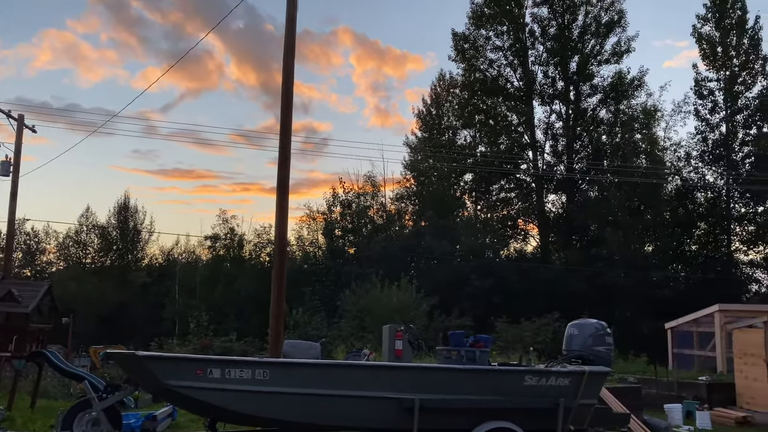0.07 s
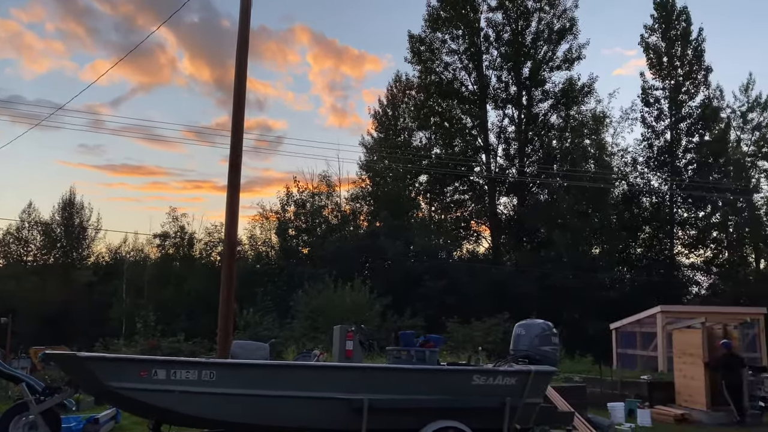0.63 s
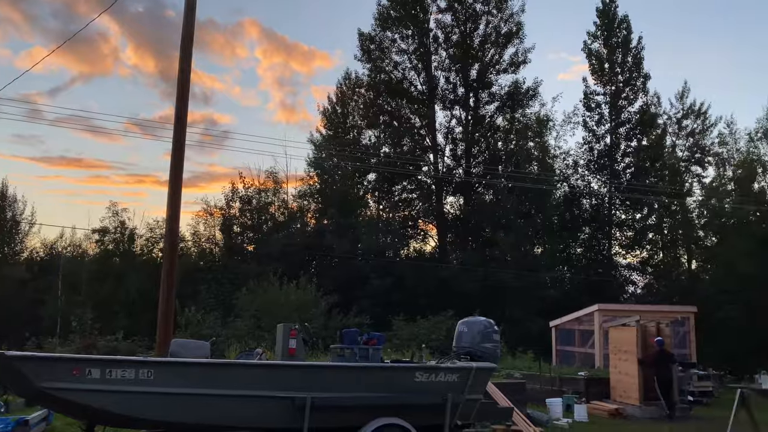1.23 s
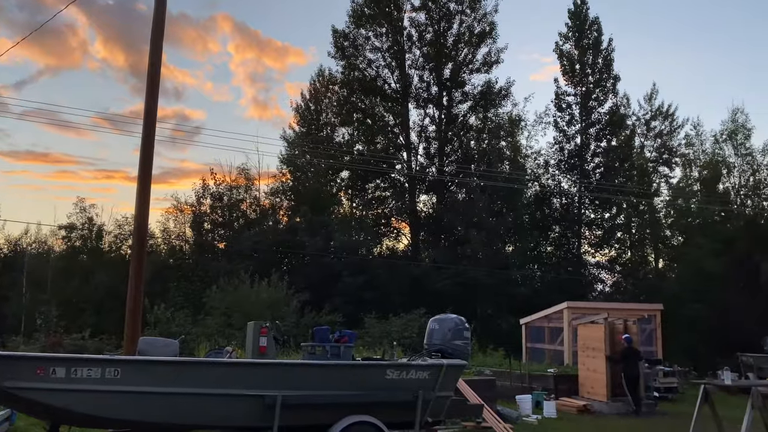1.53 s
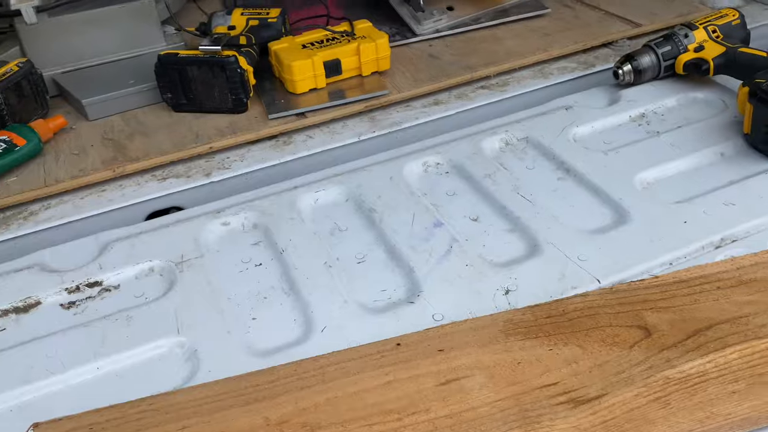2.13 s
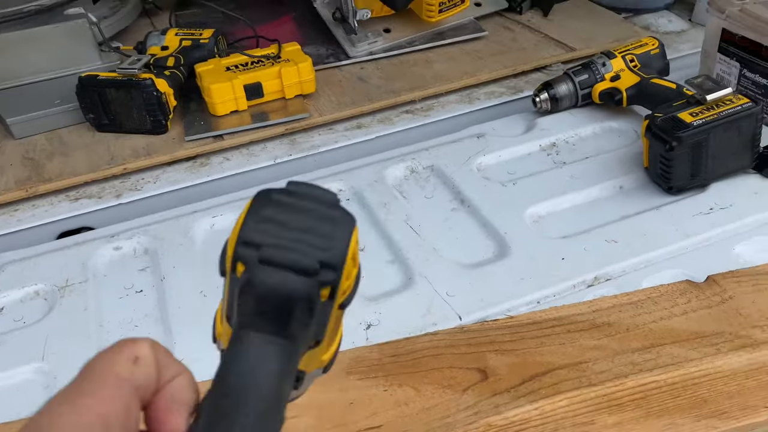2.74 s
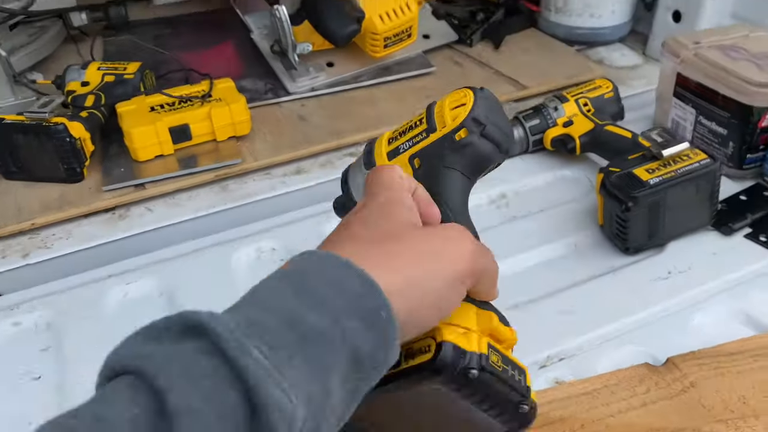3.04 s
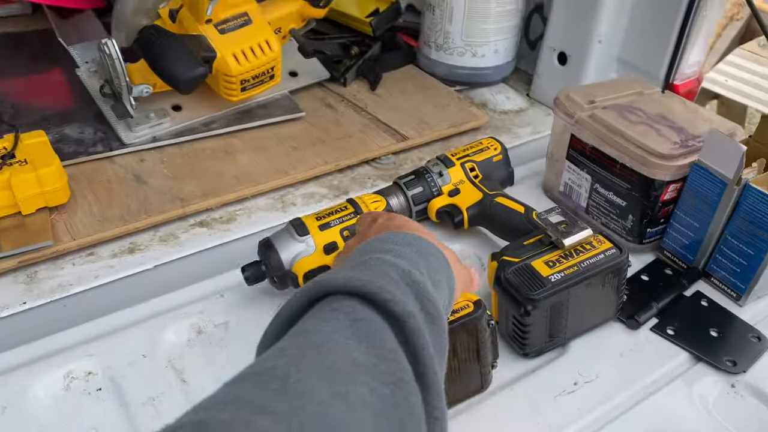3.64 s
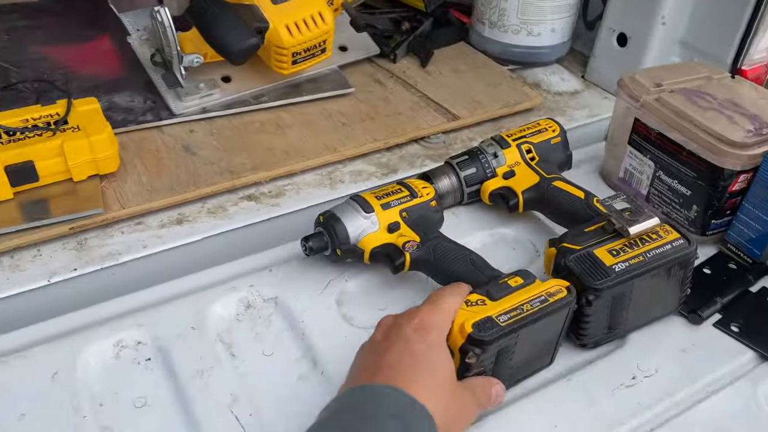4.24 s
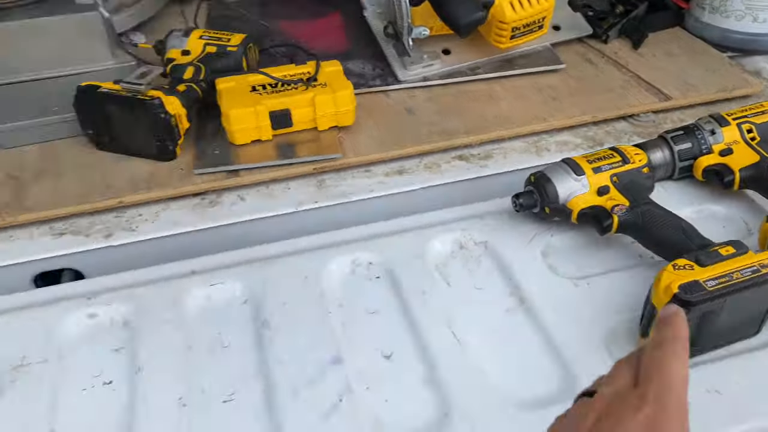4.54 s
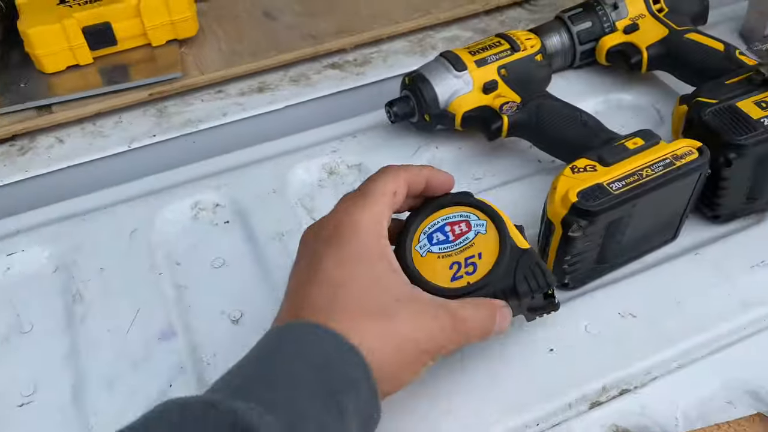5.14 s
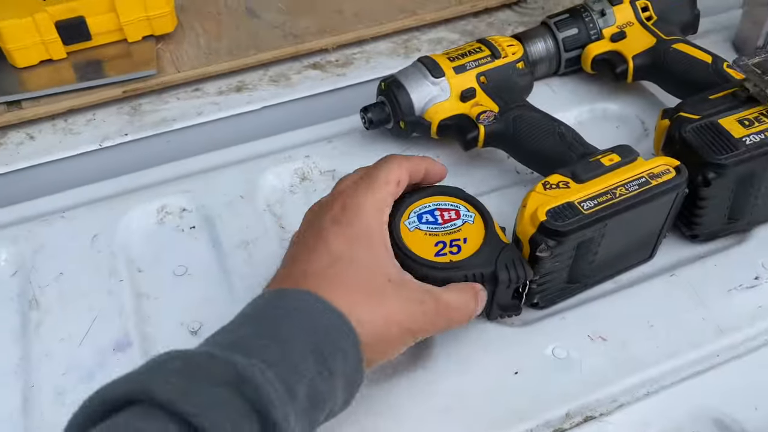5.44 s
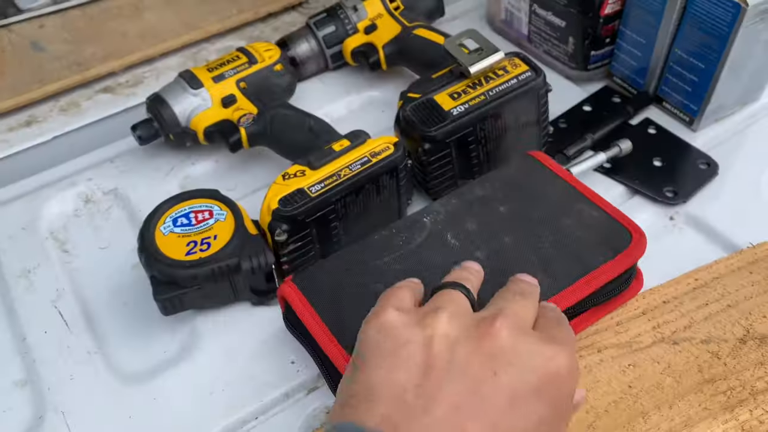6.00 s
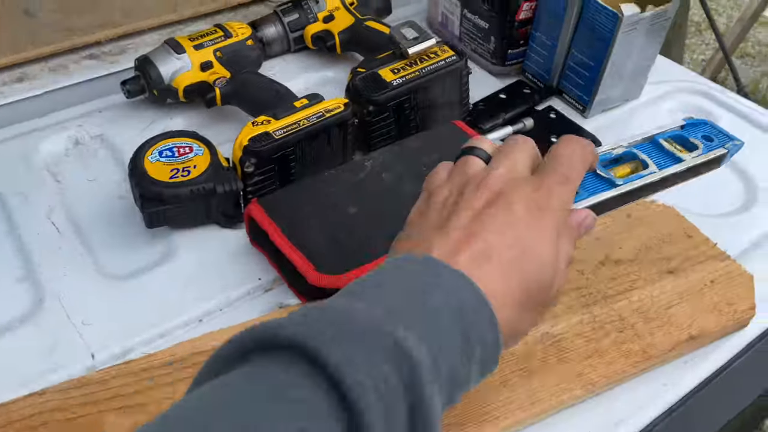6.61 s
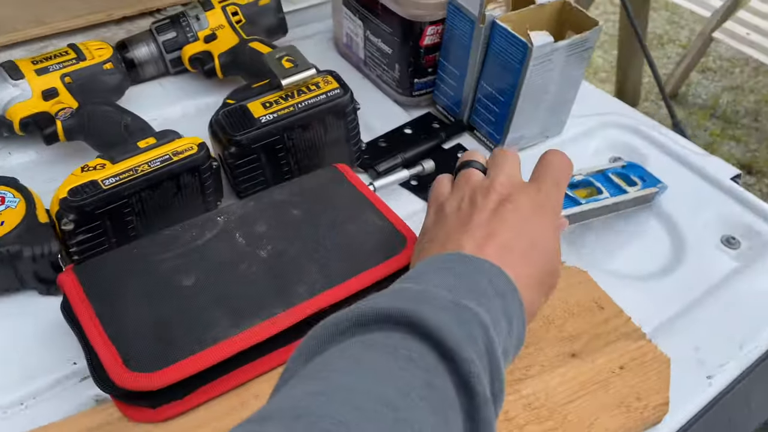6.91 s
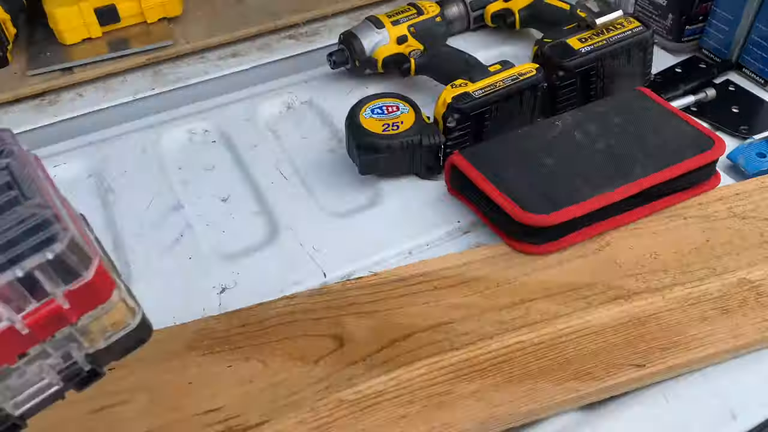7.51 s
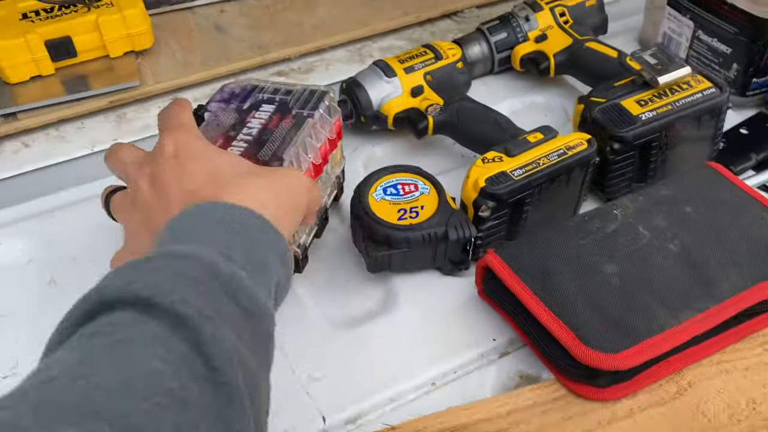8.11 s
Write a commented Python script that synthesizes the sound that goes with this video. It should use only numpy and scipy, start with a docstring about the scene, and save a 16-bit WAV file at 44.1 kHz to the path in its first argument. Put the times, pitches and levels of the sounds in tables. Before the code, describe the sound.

Tools knock and rattle one after another onto a steel truck tailgate, with soft sleeve rustle and a distant road.

```python
"""Tools on a steel tailgate

Outdoors, over the hum of a far road, a driver (landing first on its battery, then tipping onto its nose), a
tape measure, a pouch of bits, a spirit level and a plastic case are laid on a truck's tailgate. Each impact
gives a contact click, a hollow knock of the tool and a boom from the panel's bending modes; some set the tool
chattering and ringing. Between impacts a sleeve rustles by friction and plastic taps lightly in the hand."""
import sys
import numpy as np
from scipy import signal
from scipy.fft import rfft, irfft
from scipy.io import wavfile
from scipy.ndimage import uniform_filter1d

SR = 44100
rng = np.random.default_rng(int(sys.argv[2]) if len(sys.argv) > 2 else 0)


def digitize_waveform(pressure):
    """Quantize a signal to 16-bit integers and store it at the path in sys.argv[1].

    Rows of a 2-D input are taken as channels; values are limited to [-1, 1].
    """
    field = np.atleast_2d(pressure).T
    bounded = np.clip(field, -1, 1)
    quanta = np.round(bounded * 32767).astype(np.int16)
    wavfile.write(sys.argv[1], SR, quanta)


N = 368676
SIZE = 32768  # samples in one impact
T, HZ = np.arange(SIZE) / SR, np.fft.rfftfreq(SIZE, 1 / SR)
# spectral density of a contact click: f/Hz, level/dB
CLICK_SPECTRUM = [(100, -13.5), (500, 6.5), (1200, 2.5), (3000, -2), (4000, -4.5), (5000, -11), (6600, -6),
                  (8500, -19.5), (11000, -14), (13000, -30.5), (16000, -24)]


def amp(db):
    """Amplitude ratio of a level in decibels."""
    return 10 ** (np.asarray(db) / 20)


def read(points, hz):
    """Interpolation of a spectrum on a log-frequency axis."""
    f, value = np.transpose(points)
    return np.interp(np.log(hz + 1e-9), np.log(f), value)


def curve(points, t):
    """Linear interpolation of a control at times t."""
    return np.interp(t, *np.transpose(points))


def unit(x):
    """Normalisation to unit energy."""
    return x / np.sqrt(np.mean(np.sum(x ** 2, -1)) / SR + 1e-20)


def add(mix, s, sound):
    """Superposition of a sound on the mix at time s."""
    part = mix[:, round(s * SR):][:, :SIZE]
    part += sound[..., :part.shape[1]]


def colour(x, db):
    """Minimum-phase filtering: the response is causal, so attacks stay sharp."""
    log_gain = np.log(amp(np.maximum(db, db.max() - 90)))
    mirrored = np.concatenate([log_gain, log_gain[-2:0:-1]])
    return irfft(rfft(x) * np.exp(np.conj(signal.hilbert(mirrored)))[:len(HZ)])


def hump(centre_hz, octaves, slope_db, hz=HZ):
    """Band-pass response in dB: a rounded peak whose skirts fall by slope_db an octave."""
    return -slope_db * (np.hypot(np.log2((hz + 1) / centre_hz), octaves) - octaves)


def pair(z, coherence):
    """Partial coherence: two independent spectra are mixed into left and right."""
    c = np.clip(coherence, -1, 1)
    return np.array([z[0], c * z[0] + np.sqrt(1 - c ** 2) * z[1]])


def wash(shape_db, patchy_db):
    """A diffuse field: noise of unit level with the spectrum shape_db(hz, s), in drifting patches."""
    # likeness of the field at the two ears: f/Hz, coherence
    coherence = [(60, 0.99), (130, .85), (290, 0.68), (640, -0.22), (2500, -0.017), (15000, 0.22)]
    hz, t = np.fft.rfftfreq(2048, 1 / SR), np.arange(N // 512 + 5) * 512 / SR
    real, imag = rng.standard_normal((2, 2, len(t), len(hz)))
    patches = uniform_filter1d(rng.standard_normal(real[0].shape), size=8, axis=0)
    patches = uniform_filter1d(patches, size=12, axis=1)
    gain = amp(shape_db(hz, t[:, None]) + patchy_db * patches / patches.std())
    spectra = pair(real + 1j * imag, read(coherence, hz)) * gain
    x = signal.istft(spectra.transpose(0, 2, 1), nperseg=2048, noverlap=1536)[1][:, :N]
    return x / x.std()


def far_road(t):
    """Rolling noise: distant tyres radiate a broad band that drifts in pitch and level."""
    # strength of the hum: t/s, level/dB
    loudness = [(0, -52.5), (1.5, -51.5), (2.3, -54), (3.5, -57.5), (4.9, -49.5), (6.3, -47.5),
                (6.8, -54.5), (8.3, -51)]
    # centre of the band: t/s, f/Hz
    centre = [(.7, 682.5), (2, 713), (2.3, 1011), (5.5, 990), (6.3, 1085), (8, 920)]
    # shape of the band: multiple of the centre, level/dB
    band = [(.2, -11), (.5, -10), (.75, -3), (1, 0.5), (1.3, -6.5), (1.8, -14.5), (2.6, -28.5),
            (4.4, -63.5)]
    return wash(lambda hz, s: read(band, hz / curve(centre, s)), 1) * amp(curve(loudness, t))


def outdoor_air(t, cut_s=2.02, fade_s=0.015):
    """Ambient noise: the background cuts abruptly to a deeper rumble and a different hiss."""
    # spectral density before the cut: f/Hz, level/dB
    early_spectrum = [(20, -38), (45, -25), (70, 6), (190, 2.5), (350, -5), (700, -36), (1700, -36.5),
                      (15000, -47)]
    # spectral density after the cut: f/Hz, level/dB
    late_spectrum = [(15, -25), (35, -19), (62, 5), (90, -10.5), (150, -15), (300, -21), (700, -19.5),
                     (2000, -28.5), (6000, -60), (15000, -73.5)]
    early = wash(lambda hz, s: read(early_spectrum, hz), 0.51) * amp(-57.5)
    late = wash(lambda hz, s: read(late_spectrum, hz), 1.7) * amp(-48)
    after_cut = np.clip((t - cut_s) / fade_s + .5, 0, 1)
    return (1 - after_cut) * early + after_cut * late


def effort(t, roundness=0.7):
    """Envelope of the sleeve's rubbing: incoherent swells, one an arm movement, add in power."""
    # arm movements: peak t/s, level/dB, rise/s, fall/s
    strokes = [(0.07, -74, 0.036, 0.045), (1.487, -71, .008, .025), (1.91, -68, .008, .012),
               (2.04, -65, 0.0083, 0.023), (2.149, -49, 0.013, 0.041), (2.435, -49, 0.043, 0.053),
               (2.785, -53.5, 0.13, 0.082), (3.157, -60, 0.032, 0.041), (3.602, -73, 0.068, 0.3),
               (4.661, -59, 0.33, 0.19), (5.85, -44.5, 0.022, 0.072), (6.585, -53, 0.044, 0.066),
               (6.83, -55.5, 0.054, 0.36), (7.095, -47.5, 0.046, 0.065), (7.533, -46, 0.0065, 0.024),
               (7.615, -44, 0.027, 0.036), (8.301, -43.5, 0.11, 0.44)]
    power = 1e-12
    for s, db, rise_s, fall_s in strokes:
        away = np.maximum((s - t) / rise_s, (t - s) / fall_s)
        power = power + (amp(db) * np.exp(-away ** roundness)) ** 2
    return np.sqrt(power)


def sleeve(t, grain_db=3):
    """Friction noise: cloth rustles in uneven grains as its threads and folds rub."""
    # spectral density of the rustle: f/Hz, level/dB
    spectrum = [(300, -29), (1200, 1), (2800, -7.5), (7000, -10), (9000, -11), (12000, -11), (15000, -28.5)]
    # brightness, greatest while the arm reaches far: t/s, tilt/(dB/octave)
    tilt = [(2.2, -10.5), (3.4, 4), (4.8, -5), (6.1, -4), (7.6, -6.5)]
    cloth = wash(lambda hz, s: read(spectrum, hz) + curve(tilt, s) * np.log2((hz + 500) / 3000), 2)
    threads = uniform_filter1d(rng.standard_normal(N), size=180)
    folds = uniform_filter1d(rng.standard_normal(N), size=1100)
    grains = threads + 2 * folds
    return cloth * effort(t) * amp(grain_db * grains / grains.std())


def ears(delay_s=6e-5):
    """Interaural delay: partly coherent white noise reaches the nearer, left ear first."""
    # likeness of an impact at the two ears: f/Hz, coherence
    coherence = [(170, 0.5), (400, 1.08), (900, 0.7), (2500, 0.38), (8000, -0.1)]
    lag = np.exp(-2j * np.pi * HZ * delay_s * np.array([[0], [1]]))
    return irfft(pair(rfft(rng.standard_normal((2, SIZE))), read(coherence, HZ)) * lag)


def burst(db, t60, tail_db, tail_t60, spike=0):
    """Overlapping modes decay like noise: an optional bright spike, a quick snap, a duller tail."""
    noise = ears()
    treble = HZ ** 2 / (HZ ** 2 + 7500 ** 2)
    crack = colour(noise * spike * np.exp(-T / .0028), db)
    snap = colour(noise * amp(-60 * T / t60), db - 12 * treble)
    tail = colour(noise * amp(tail_db - 60 * T / tail_t60), db - 27 * treble)
    return unit(crack + snap + tail)


def tap(knock_hz):
    """A light, well-damped impact: a short knock and a click."""
    knock = burst(hump(knock_hz, 0.13, 23), t60=0.038, tail_db=-23.5, tail_t60=0.33)
    click = burst(read(CLICK_SPECTRUM, HZ), t60=0.012, tail_db=-2, tail_t60=0.4, spike=2.5)
    return knock + amp(-15.5) * click


def handling(t, ticks_per_s=8):
    """Light taps, plastic in the hand and a few small rattles of the bits in their pouch, and a Poisson process
    of faint ticks scaled by the arm's movement."""
    # light taps (those at 5.909 and 5.997 s are small rattles of the bits in the pouch): t/s, energy level/dB,
    # knock f/Hz
    taps = [(0.46, -87, 1590), (2.244, -50.5, 780), (2.286, -61, 1100), (2.428, -51, 1014),
            (2.581, -76, 2770), (2.704, -71.5, 2570), (2.837, -85, 4400), (3.153, -71.5, 1530),
            (4.509, -66.5, 1180), (5.072, -69.5, 1900), (5.909, -62.5, 3180), (5.997, -71, 3470),
            (6.5633, -61.5, 2120), (6.584, -65.5, 2390), (6.843, -62.5, 1430), (6.983, -67, 1500),
            (7.238, -66, 2510), (7.548, -74, 2830), (7.611, -70, 1850), (7.914, -64.5, 1220)]
    out = np.zeros((2, N))
    for s, db, knock_hz in taps:
        add(out, s, amp(db) * tap(knock_hz))
    contacts = rng.random(N) < ticks_per_s / SR
    ticks = contacts * amp(-19.5 + 6 * rng.uniform(-0.56, 1, N)) * effort(t)
    return out + signal.oaconvolve(ticks[None], tap(knock_hz=2360), axes=1)[:, :N]


def partials(modes, detune, phase):
    """Free vibration: one damped sine a mode, detuned slightly by the load on the metal."""
    hz, db, t60 = np.transpose(modes)[:, :, None]
    hz = hz * (1 + detune * rng.standard_normal(hz.shape))
    return amp(db - 60 * T / t60) * np.sin(2 * np.pi * (hz * T + phase))


def panel(centre_hz, damping_db_per_s, rise_cycles=1.2):
    """Plate bending modes: those near the boom's centre are driven hardest; lower ones build slower."""
    # low modes of the tailgate: f/Hz, level/dB, t60/s
    modes = [(102, -3, 0.82), (118.7, 5.5, 0.52), (144.4, -4, 0.4), (175.5, -6, 0.45), (191.7, -3, 0.4),
             (236.9, 3.5, 0.27), (266.5, -0.5, 0.33), (307, -4, 0.17), (370.7, -9, .33)]
    hz = np.transpose(modes)[0][:, None]
    build = 1 - np.exp(-(T * hz / rise_cycles) ** 2)
    swing = 1 + 0.53 * np.exp(-(T / 0.03) ** 2)  # largest at first, then the tool's weight damps it
    excitation = amp(hump(centre_hz, 0.1, 7.8, hz))
    tones = (excitation * build * swing * partials(modes, 0.015, rng.random(hz.shape))).sum(0)
    flex = burst(hump(centre_hz, 0.079, 24), t60=0.19, tail_db=-8, tail_t60=0.34)
    return unit((unit(tones) + amp(-1) * flex) * amp(-abs(damping_db_per_s) * T))


def skin(knock_hz, t60=.21):
    """Resonance: the steel's modes nearest the knock ring, a little out of phase at the two ears."""
    # upper modes of the tailgate's skin: f/Hz, level/dB
    upper_modes = [(463, 8), (592, -8), (630, 0.5), (815, 2), (856, -6.5), (904, -4), (996, -3.5),
                   (1061, -1.5), (1170, -4), (1389, -3.5)]
    modes = [(hz, db + hump(knock_hz, 0.36, 36, hz), t60) for hz, db in upper_modes]
    phase = rng.random((len(modes), 1)) + 0.17 * rng.standard_normal((2, len(modes), 1))
    return unit(partials(modes, 0.008, phase).sum(1))


def between(soft, hard, hardness):
    """Linear interpolation from a soft contact to a hard one."""
    return soft + (hard - soft) * hardness


def tailgate(settle_db_per_s=36):
    """Impact excitation: the panel booms, the suspension thumps, the tool knocks, the contact clicks."""
    # impacts: t/s, tool, boom level/dB, boom centre f/Hz, contact hardness (0-1)
    blows = [(3.734, "battery", -49.5, 238, 0.67), (3.742, "battery", -39, 135, 0.38),
             (3.782, "battery", -46.5, 195, 0.49), (3.856, "battery", -31, 215, 0.84),
             (3.858, "battery", -34, 330, 0), (3.882, "driver", -44, 340, 0.72),
             (3.951, "battery", -34.5, 285, 0.67), (4.157, "battery", -51, 240, 0.67),
             (4.167, "battery", -46, 113.6, 0.39), (4.205, "battery", -47, 209, 0.57),
             (4.3109, "driver", -38.5, 238, 0.7), (4.319, "driver", -33.5, 244, 0.4),
             (5.284, "tape", -45.5, 205.4, 0.47), (5.3503, "tape", -50.5, 205, 0.51),
             (5.353, "tape", -51.5, 232, 0.34), (5.389, "tape", -53, 162.7, 0.46),
             (5.8601, "pouch", -41.5, 211, 0.69), (5.902, "pouch", -46, 274, 1),
             (5.935, "pouch", -42, 195, 0.44), (6.01, "pouch", -43, 139, 0.33),
             (6.911, "level", -41.5, 247, 0.83), (6.933, "level", -41, 246, 0.55),
             (7.085, "level", -52.5, 275, 0.62), (7.174, "level", -42.5, 195, 0.69),
             (7.180, "level", -37.5, 295, 0.78), (8.1016, "case", -36, 183, 0.33),
             (8.229, "case", -51.5, 182, 0.35), (8.268, "case", -31.5, 227, 0.52),
             (8.300, "case", -40, 193, 0), (8.3059, "case", -48.5, 227, 0.67), (8.335, "case", -50, 170, 0)]
    # by tool, before hardness and settling act: thump level/dB, knock f/Hz, click level/dB,
    # click tilt/(dB/octave), ring length factor, panel damping/(dB/s) (sign ignored)
    tools = {"battery": (-5, 524, -0.5, -3, 3, -9), "driver": (-24.5, 790.5, -3, -2.5, 2, 9),
             "tape": (-5, 680, 7.5, 8, 3.5, 25.5), "pouch": (-12, 759.5, -11, -8, 3.5, 4.5),
             "level": (-18, 866.5, 2, 0, 1.9, 55.5), "case": (-14, 702, 10.5, -1, 2.5, 28.5)}
    out, first_touch = np.zeros((2, N)), {}
    thump = unit(T * np.exp(-(T / 0.026) ** 2) * np.sin(2 * np.pi * 72 * T))
    for s, tool, boom_db, boom_hz, hardness in blows:
        weight_db, shell_hz, edge_db, edge_tilt_db, ring, damping_db_per_s = tools[tool]
        # the thump fades once the tool's weight rests on the steel
        thump_db = weight_db - settle_db_per_s * (s - first_touch.setdefault(tool, s))
        # a harder contact gives more knock, a louder, brighter click and a shorter ring
        knock_db = between(-26, 5.5, hardness)
        click_db = edge_db + between(-35, 1.5, hardness)
        tilt_db = edge_tilt_db + between(-13.5, 9.5, hardness)
        length = ring * between(0.84, 0.75, hardness)
        knock_hz = shell_hz * (boom_hz / 235) ** 0.21  # rises gently with the boom's centre
        shell = burst(hump(knock_hz, 0.84, 31), t60=0.044 * length, tail_db=-18.5, tail_t60=0.092)
        knock = unit(shell + amp(-3.5) * skin(knock_hz))
        click_shape = read(CLICK_SPECTRUM, HZ) + tilt_db * np.log2((HZ + 500) / 3000)
        click = burst(click_shape, t60=0.048 * length, tail_db=-9, tail_t60=0.18, spike=0.81)
        boom = panel(boom_hz, damping_db_per_s)
        blow = boom + amp(thump_db) * thump + amp(knock_db) * knock + amp(click_db) * click
        add(out, s, amp(boom_db) * blow)
    return out


def ringing_tools(bounce_gap_s=.007, bounce_s=.0016, slide_db=-8, strike_db=-10):
    """Forced vibration: a strike, brief chatter and dying bounces drive a tool's resonances."""
    # resonances of the driver's steel nose, the tape measure, the steel bits, the aluminium level
    # and the plastic case: f/Hz, width/Hz, level/dB
    driver = [(858, 47, 25), (1027, 50, 24), (2007, 110, 13.5), (2770, 170, 5.5), (4700, 430, -0.5),
              (6760, 670, -37.5)]
    tape = [(657, 65, 9), (943, 20, 5.5), (2450, 46, -7), (2940, 340, -15), (3830, 170, -20),
            (7120, 420, -16.5)]
    bits = [(1330, 100, 10.5), (2630, 120, 3), (3570, 300, -7), (4900, 200, 1.5), (6480, 380, -1),
            (8000, 900, -12), (10080, 280, -1.5), (11600, 500, -13), (12430, 130, -9)]
    level = [(773, 60, 5.5), (952, 42, 13.5), (1137, 35, 14), (2240, 190, 3), (2665, 170, 4),
             (3400, 530, -3.5)]
    case = [(780, 59, -4.5), (1080, 41, -1), (1367, 38, 11), (1850, 460, -14), (4370, 2000, -24.5)]
    # by body: resonances, rattle level/dB, rattle t60/s
    bodies = {"driver": (driver, -1, 0.11), "tape": (tape, -11, 0.082), "bits": (bits, -5.5, 0.12),
              "level": (level, -6, 0.12), "case": (case, -12.5, .05)}
    # tools set ringing: t/s, body, energy level/dB, chatter time/s
    rings = [(3.8565, "driver", -35.5, 0.00093), (3.949, "driver", -48, 0.004),
             (4.205, "driver", -62, 0.005), (4.311, "driver", -43, 0.0054), (5.284, "tape", -52, 0.0084),
             (5.353, "tape", -49, 0.0056), (5.8573, "bits", -33, 0.0085), (5.939, "bits", -62, 0.0062),
             (6.9108, "level", -38, 0.0043), (6.933, "level", -47, 0.0089), (6.949, "level", -54.5, 0.006),
             (7.087, "level", -57, 0.008), (7.180, "level", -36, 0.014), (8.102, "case", -62, 0.013),
             (8.268, "case", -40, 0.0082), (8.307, "case", -52.5, 0.0053)]
    strike = unit(1. * (np.arange(SIZE) == np.array([[0], [3]])))  # one impulse, left ear first
    out = np.zeros((2, N))
    for s, name, level_db, chatter_s in rings:
        modes, rattle_db, rattle_t60 = bodies[name]
        hz, width, db = np.transpose(modes)[:, :, None]
        power = (amp(db) ** 2 / (1 + ((HZ - hz) / width) ** 2) ** 1.76).sum(0)
        since = T - np.cumsum(bounce_gap_s * (.5 + rng.random(size=24)))[:, None]
        bounces = ((since > 0) * np.exp(-abs(since) / bounce_s)).sum(0)
        rattle = 2 * (amp(slide_db) + bounces) * amp(rattle_db - 60 * T / rattle_t60)
        chatter = np.exp(-(T / chatter_s) ** 4)
        force = unit(ears() * (chatter + rattle)) + amp(strike_db) * strike
        add(out, s, amp(level_db) * unit(colour(force, 10 * np.log10(power))))
    return out


def yard_echoes(x, build_s=0.0066):
    """Reverberation: the truck bed and the things around it scatter sound into a decaying tail."""
    # reverberation time: f/Hz, t60/s
    decay_times = [(200, 0.48), (1500, 0.26), (5000, 0.79), (12000, 0.29)]
    hz, t, spectra = signal.stft(rng.standard_normal((2, SIZE)), SR, nperseg=256)
    fall = amp(-60 * t / read(decay_times, hz)[:, None])
    tail = signal.istft(spectra * fall * (1 - np.exp(-t / build_s)), SR, nperseg=256)[1]
    return signal.fftconvolve(x, tail / np.linalg.norm(tail[0]), axes=1)[:, :N]


def scene():
    """Superposition in the open air; a level difference between the ears sets the tools a little left."""
    # interaural level difference: f/Hz, left minus right level/dB
    lean = [(100, 0.5), (260, 0), (600, 6), (1100, 4), (2200, -2.5), (4500, 4), (9000, -2.5)]
    t = np.arange(N) / SR
    near = tailgate() + handling(t) + ringing_tools()
    lean_db = read(lean, np.fft.rfftfreq(N, 1 / SR)) * np.array([[.5], [-.5]])
    near = irfft(rfft(near) * amp(lean_db), N)
    return near + amp(-32.5) * yard_echoes(near) + far_road(t) + outdoor_air(t) + sleeve(t)


def record(dry):
    """Soft saturation rounds peaks just below full scale; a low-pass filter limits the band."""
    rounded = dry / (1 + dry ** 6) ** (1 / 6)
    low_pass = signal.firwin(255, cutoff=15900, window=("kaiser", 9), fs=SR)
    return signal.oaconvolve(rounded, low_pass[None], "same")


dry = scene()
out = record(dry)
digitize_waveform(out)
```